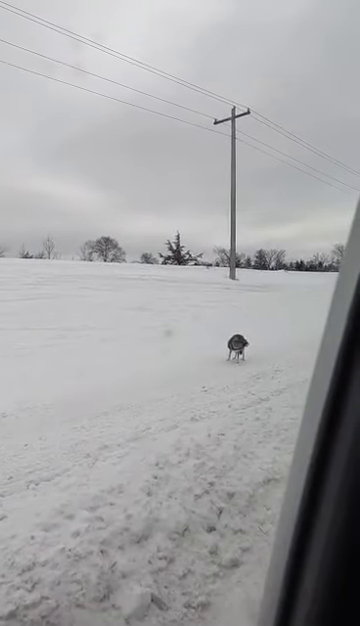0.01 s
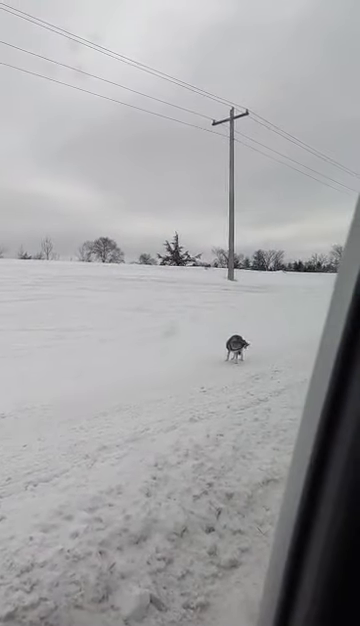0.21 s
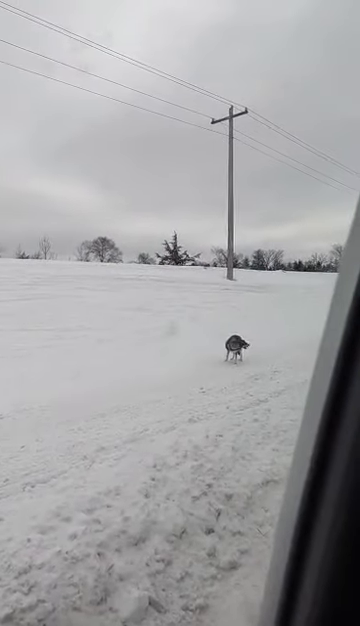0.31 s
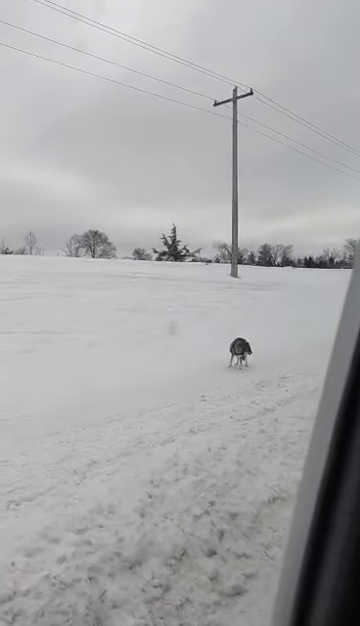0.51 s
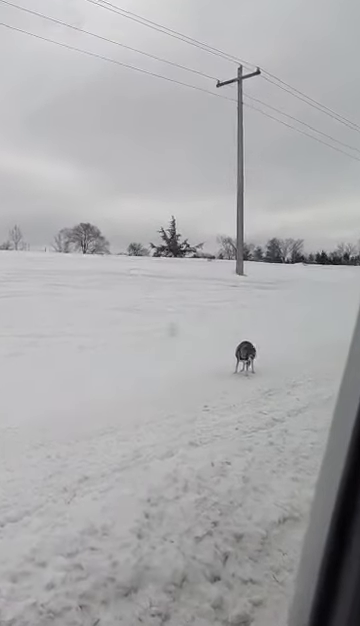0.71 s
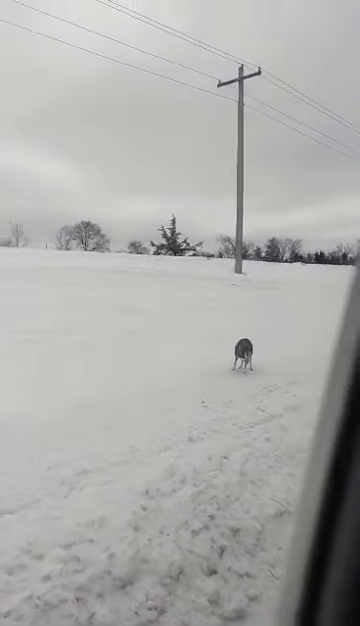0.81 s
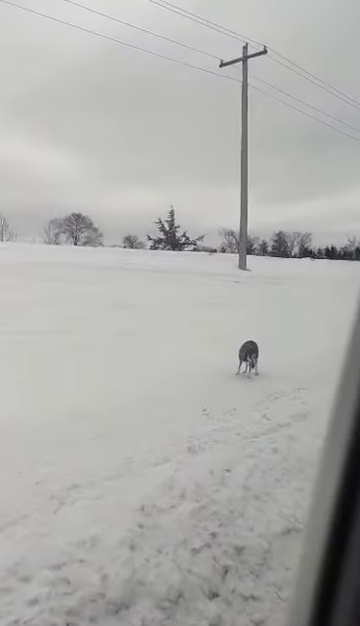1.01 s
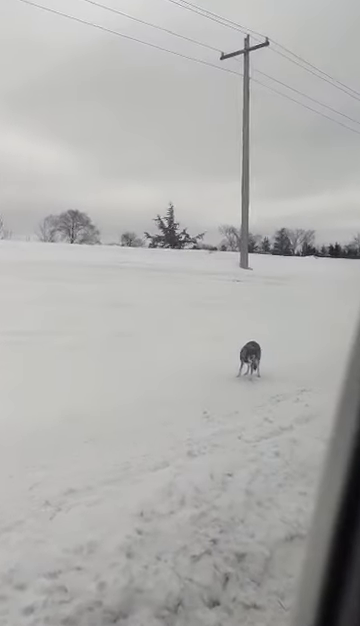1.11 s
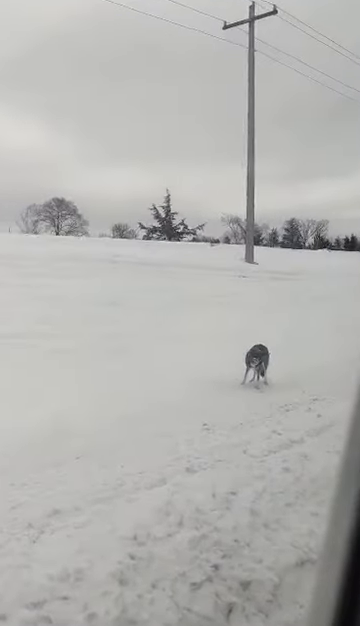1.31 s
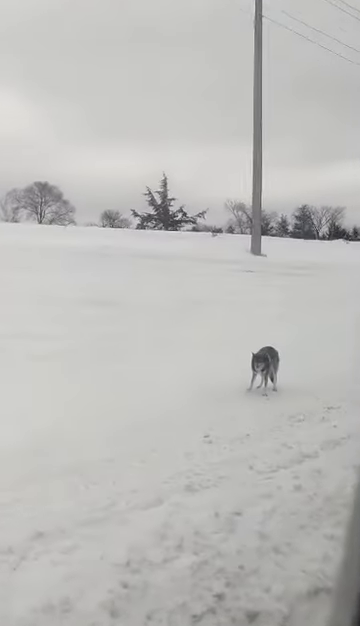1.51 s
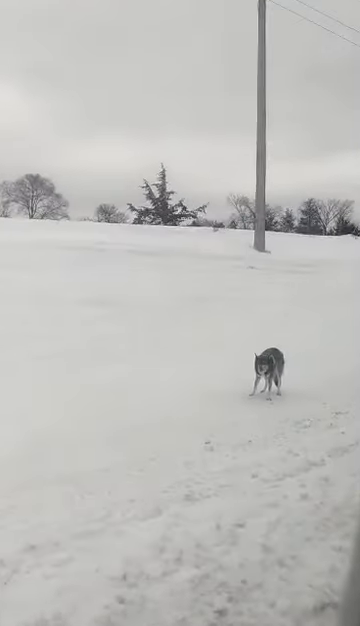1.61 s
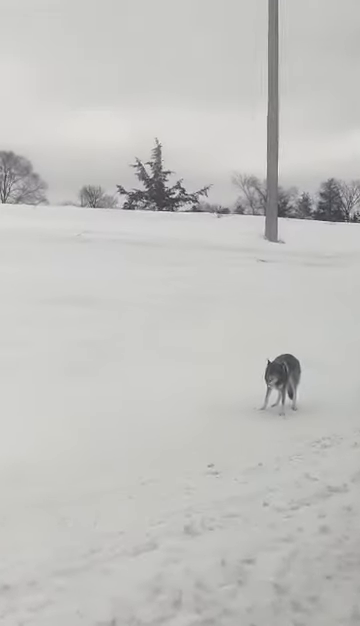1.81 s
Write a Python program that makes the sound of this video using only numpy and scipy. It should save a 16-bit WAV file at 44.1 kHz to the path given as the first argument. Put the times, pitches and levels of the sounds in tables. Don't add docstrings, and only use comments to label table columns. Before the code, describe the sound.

A handheld phone is knocked hard, then rubbed and rustled by fabric inside a parked car.

```python
import sys
import numpy as np
from scipy import signal
from scipy.fft import rfft, irfft
from scipy.io import wavfile
from scipy.ndimage import uniform_filter1d

SR = 44100
rng = np.random.default_rng(int(sys.argv[2]) if len(sys.argv) > 2 else 0)


def to_wav(s):
    ch = np.atleast_2d(s).T
    pcm = np.round(np.clip(ch, -1, 1) * 32767)
    wavfile.write(sys.argv[1], SR, pcm.astype(np.int16))


def level_to_linear(level):
    exponent = np.asarray(level, float) / 20
    return 10 ** exponent


N = 83790
LAG_SAMPLES = 18
SHELF_HZ = 7090


def level(x, db):
    return x * level_to_linear(db) / np.sqrt(np.mean(x ** 2))


def band(x, hz, width):
    return signal.lfilter(*signal.iirpeak(min(hz, .45 * SR), hz / width, fs=SR), x)


def walk(rate):
    hold = int(SR / rate)
    steps = np.repeat(rng.standard_normal(N // hold + 1), hold)
    return 1.2 * uniform_filter1d(uniform_filter1d(steps, hold), hold)[:N]


def ports(x, pan_db=0.):
    return np.array([x * level_to_linear(pan_db / 2), np.roll(x, LAG_SAMPLES) * level_to_linear(-pan_db / 2)])


def gate(start, length, attack, release):
    t = np.arange(N) / SR - start
    rise = np.sin(np.pi / 2 * np.clip(t / attack + .5, 0, 1)) ** 2
    return rise * np.exp(-np.clip(t - length, 0, None) / release * 2)


def bands(table, source, shared, flicker_db, extra_db):
    out, table = 0, np.array(table)
    octaves = np.log2(table[-1, 0] / table[0, 0])
    for hz in table[0, 0] * 2 ** np.arange(.2, octaves, 1 / 3):
        share = np.clip(shared(hz), 0, 1)
        common = np.sqrt(share) * ports(source())
        both = common + np.sqrt(1 - share) * np.array([source(), source()])
        noise = band(band(both, hz, hz / 3), hz, hz / 3) / np.sqrt(hz / 1000)
        db = np.interp(np.log(hz), np.log(table[:, 0]), table[:, 1]) + 10 * np.log10(hz / 1000)
        flicker = flicker_db * (1 + hz / 12000) * walk(35.14)
        out = out + level_to_linear(db + flicker) * extra_db(hz) * noise
    return out


def cabin():
    # (frequency [Hz], density [dB per Hz])
    rumble = [(25, 22.5), (45, -4.5), (190, 3.5), (370, -17), (900, -23.5), (1600, -29), (6800, -44),
              (12800, -32.5)]
    # (time [s], level [dB])
    hand = [
        (0, -6),
        (.16, 4),
        (0.349, 0),
        (0.551, 0.5),
        (0.702, -4.5),
        (0.899, -2),
        (1.1, 8.5),
        (1.298, -5),
        (1.501, 0),
        (1.9, -3),
    ]
    s, db = np.array(hand).T
    unrest = np.interp(np.arange(N) / SR, s, db)

    def swell(hz):
        return level_to_linear(unrest * np.clip(1.3 - hz / 300, 0, 1) + 1.8 * walk(5))

    noise = bands(rumble, lambda: rng.standard_normal(N), lambda hz: 1.05 - hz / 2500, 3.43, swell)
    return level(noise, -39)


def motor():
    # (time [s], level [dB])
    effort = [
        (0, -67),
        (.9, -54.5),
        (1.1, -50.5),
        (1.4, -48),
        (1.55, -53),
        (1.629, -44.5),
        (1.72, -47),
        (1.8, -46),
        (1.9, -47),
    ]
    # (frequency [Hz], bandwidth [Hz], level [dB])
    panel = [(400, 120, -8), (632, 22, 5), (735, 30, -2), (870, 40, -5), (1048, 28, 0), (1350, 120, -10),
             (1570, 50, -6), (2400, 1200, -16), (5500, 3500, -21)]
    commutator_hz, roughness = 104.3, 0.87
    phase = np.cumsum(commutator_hz * (1 + 0.0084 * walk(7.1))) / SR
    pulses = level(np.diff(np.floor(phase), prepend=0), 0)
    brush = 0.89 * rng.standard_normal(N) + 0.86 * rng.standard_normal((2, N))
    drive = pulses + 4 * roughness * brush
    hum = sum(level_to_linear(db + 1.1 * walk(13)) * band(band(drive, hz, w), hz, 3 * w) for hz, w, db in panel)
    s, db = np.array(effort).T
    return level(hum, 0) * level_to_linear(np.interp(np.arange(N) / SR, s, db))


def squeaks():
    # (time [s], length [s], start pitch [Hz], end pitch [Hz], level [dB])
    glides = [(1.072, .008, 1600, 1620, -48), (1.055, .035, 2800, 3000, -51),
              (1.134, .016, 3200, 2900, -46), (1.232, .014, 900, 920, -44), (1.228, .022, 2650, 3050, -46),
              (1.247, .028, 950, 1300, -47), (1.253, .022, 2150, 2650, -46), (1.352, .02, 2300, 2450, -49),
              (.958, .012, 2050, 2050, -51), (1.15, .024, 2900, 1800, -49), (1.296, .012, 2900, 2650, -49),
              (1.118, .018, 4700, 4200, -48), (1.125, .022, 3700, 3500, -50),
              (1.255, .025, 3200, 3800, -51), (1.09, .012, 1600, 1600, -48), (1.37, .012, 1000, 1200, -48),
              (.098, .012, 2000, 2050, -62)]
    out, t = 0, np.arange(N) / SR
    for s, n, hz0, hz1, db in glides:
        hz = np.interp(t, [s, s + n], [hz0, hz1]) * (1 + .022 * walk(400))
        loudness = level_to_linear(db + 2 + 4 * walk(200)) * gate(s, n, .007, .006)
        out = out + loudness * np.sin(2 * np.pi * np.cumsum(hz) / SR)
    return np.outer(level_to_linear([1.5, -1.5]), out)


def sleeve():
    # (time [s], length [s], level [dB], tilt [dB per octave])
    rubs = [(0, 0.0042, -53.5, -4.5), (0.107, 0.039, -61, 0), (0.149, 0.093, -52.5, -0.5),
            (0.197, 0.02, -37, -7), (0.213, 0.029, -45.5, -0.5), (0.244, 0.042, -50.5, -3.5),
            (0.28, 0.041, -65.5, -7), (0.385, 0.055, -58, 4.5), (0.425, 0.034, -51, -0.5),
            (0.467, 0.085, -55.5, 0), (0.518, 0.038, -52, 0), (0.563, 0.037, -54, 2.5),
            (0.622, 0.012, -61.5, -4), (0.646, 0.042, -65, 1), (0.746, 0.036, -60.5, 7),
            (0.778, 0.098, -52.5, 0), (0.885, 0.065, -54, -1.5), (0.951, 0.083, -43, -1),
            (1.041, 0.065, -40.5, 0), (1.116, 0.061, -40, 2), (1.181, 0.11, -44, 2.5),
            (1.238, 0.072, -40.5, 4), (1.326, 0.045, -40, 1.5), (1.371, 0.073, -53.5, -2),
            (1.461, 0.12, -58.5, -2.5), (1.572, 0.073, -53, -2), (1.733, 0.089, -48.5, 0.5),
            (1.787, 0.052, -45.5, -1.5)]
    # (frequency [Hz], density [dB per Hz])
    cloth = [(250, 1), (700, 0.5), (1450, -4), (2400, -5), (4100, -8.5), (6700, -7.5), (8500, -9),
             (12800, -24)]
    attack_s, release_s = .013, .02
    grain_db, flicker_db, shared, pan_db = 2.5, 2.6, .35, 2.2
    shapes = np.array([gate(s, n, attack_s, release_s) for s, n, _, _ in rubs])
    db, tilt = np.array(rubs)[:, 2:].T

    def grains():
        return rng.standard_normal(N) * level_to_linear(grain_db * rng.exponential(size=N))

    def strokes(hz):
        return np.sqrt(level_to_linear(2 * (db + tilt * np.log2(hz / 3500))) @ shapes ** 2)

    gain = level_to_linear(8.5 + np.array([[.5], [-.5]]) * pan_db + 1.05 * walk(89.4))
    return gain * bands(cloth, grains, lambda hz: shared, flicker_db, strokes)


def ticks():
    # (time [s], level [dB], centre frequency [Hz])
    snaps = [(.197, -31, 2480), (.2025, -25.5, 1540), (0.2098, -25, 910), (0.437, -38, 3600),
             (0.5239, -36, 3970), (0.577, -43, 4440), (.592, -42, 4500), (.629, -35, 790),
             (0.667, -38.5, 900), (.959, -41, 2530), (1.365, -26, 2290), (1.738, -46, 4000),
             (1.797, -28, 3030)]
    t60_s = .016
    out, t = np.zeros(N), np.arange(SR // 20) / SR
    for s, db, hz in snaps:
        burst = rng.standard_normal(len(t)) * np.exp(-np.log(1000) * t / t60_s)
        i = int(s * SR)
        out[i:i + len(t)] += level_to_linear(db) * band(burst, hz, 2.4 * hz)
    return np.outer(level_to_linear([1.2, -1.2]), out)


def blows():
    # (time [s], level [dB], jolt pitch [Hz])
    jolts = [(-.005, -20.5, 47.4), (0.198, -12.5, 450), (0.203, 1.5, 419), (0.2071, -6.5, 319),
             (0.2164, 1, 250), (.221, -2.5, 128), (0.2419, -6, 142), (0.2554, -5, 150),
             (0.279, -11.5, 69.4), (0.297, -20.5, 198), (0.313, -14.5, 150), (0.365, -30.5, 64),
             (0.4327, -24, 333), (.444, -24, 276), (0.95, -24.5, 320), (0.972, -31, 178),
             (1.039, -20.5, 123), (1.061, -20, 136), (1.072, -21, 82.6), (1.086, -18.5, 125),
             (1.101, -20.5, 112), (1.114, -22.5, 115), (1.14, -23.5, 120), (1.173, -23.5, 185),
             (1.365, -16.5, 292), (1.3794, -17, 190), (1.435, -29, 153), (1.733, -28.5, 202),
             (1.8, -25.5, 250), (1.829, -26, 236), (.234, -14.5, 393), (.268, -18.5, 335),
             (.291, -21.5, 420), (.07, -26.5, 49.4), (.11, -29.5, 69.4), (.451, -25.5, 129), (.5, -34, 190),
             (0.53, -36, 203), (.62, -31.5, 150), (.775, -32, 260), (1.093, -25, 150), (1.127, -28, 100),
             (1.152, -28.5, 110), (1.387, -23.5, 171), (1.52, -32.5, 260)]
    # (frequency [Hz], level [dB], decay time T60 [s])
    case = [(54.4, 2, .12), (79.3, -7.5, 0.088), (100, 4, 0.056), (150, -5, 0.064), (202.4, -4, 0.069),
            (250, 4, 0.046), (295.5, 1, 0.087), (450, 1, 0.055), (626, 1.5, 0.069), (850, -13, 0.06),
            (1320, -31, .02)]
    # (frequency [Hz], left minus right [dB])
    case_pan = [(60, .6), (200, -.5), (350, 1.5), (640, 4.5), (1300, 2.5)]
    scatter_db = 3
    out, scatter = np.zeros((2, N)), rng.standard_normal((len(jolts), len(case)))
    t = np.arange(SR // 4) / SR
    push_t = t[:SR // 30]
    pans = np.interp(np.array(case)[:, 0], *np.array(case_pan).T)
    for (s, db, jolt_hz), chance in zip(jolts, scatter):
        push = np.sin(2 * np.pi * np.clip(push_t * jolt_hz, 0, 1)) * np.exp(-1.5 * push_t * jolt_hz)
        ring = 0
        for (hz, g, t60), pan, c in zip(case, pans, chance):
            tone = np.sin(2 * np.pi * hz * (1 + 0.014 * c) * t) * np.exp(-np.log(1000) * t / t60)
            ring = ring + np.outer(level_to_linear([pan / 2, -pan / 2]), level_to_linear(g + scatter_db * c) * tone)
        hit = signal.fftconvolve(ring, push[None])[:, :len(t)]
        hit = level_to_linear(db) * hit / np.abs(hit).max()
        i = int(s * SR)
        out[:, max(i, 0):i + len(t)] += hit[:, max(-i, 0):N - i]
    return np.array([out[0], np.roll(out[1], LAG_SAMPLES)])


def scene():
    return cabin() + motor() + squeaks() + sleeve() + ticks() + blows()


def starve(x):
    # (frequency [Hz], share [0-1])
    starved = [(1600, 0), (2500, .07), (4600, .24), (6500, .1), (8200, .6), (12000, .78)]
    hole_band_hz, hole_db, quiet_bias = 420, -28, .35
    hz, _, z = signal.stft(x, SR, nperseg=1024)
    chance = rng.standard_normal((int(SR / 2 / hole_band_hz) + 1, z.shape[-1]))
    loudness = np.log(np.abs(z[:, hz > 1500]).mean(axis=(0, 1)) + 1e-9)
    band_hz = np.arange(len(chance))[:, None] * hole_band_hz
    score = uniform_filter1d(chance, size=4) + quiet_bias * loudness * (band_hz < SHELF_HZ)
    rank = score.argsort().argsort() / z.shape[-1]
    holes = rank[(hz / hole_band_hz).astype(int)] < np.interp(hz, *np.array(starved).T)[:, None]
    return signal.istft(z * np.where(holes, level_to_linear(hole_db), 1), SR, nperseg=1024)[1][:, :N]


def top_cut(x):
    return signal.sosfilt(signal.butter(12, 12940, fs=SR, output="sos"), x)


def record(dry):
    rumble_cut_hz, shelf_db, top_hz, ceiling = 40.6, -8.5, 13000, 0.94
    x = signal.sosfilt(signal.butter(2, rumble_cut_hz, "high", fs=SR, output="sos"), dry)
    hz = np.arange(N // 2 + 1) * SR / N
    shelf = level_to_linear(shelf_db * np.clip((hz - SHELF_HZ) / 500, 0, 1))
    x = irfft(rfft(x) * shelf * (hz < top_hz), N)
    mix = starve(ceiling * np.tanh(x / ceiling))
    return top_cut(mix)


dry = scene()
out = record(dry)
to_wav(out)
```